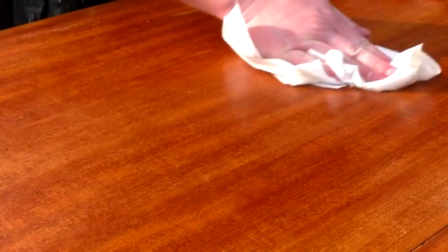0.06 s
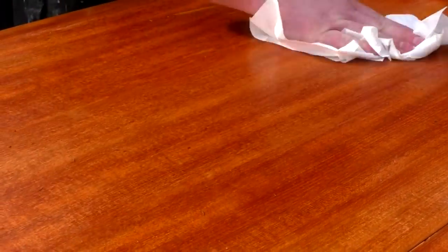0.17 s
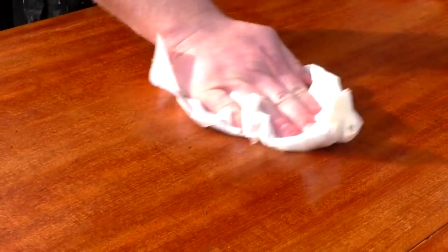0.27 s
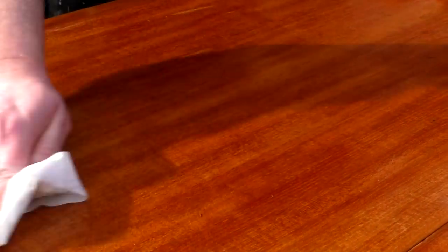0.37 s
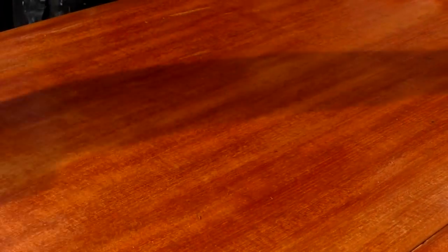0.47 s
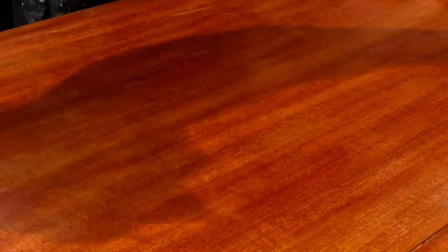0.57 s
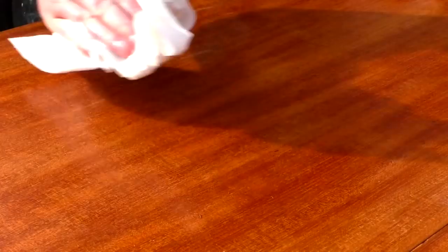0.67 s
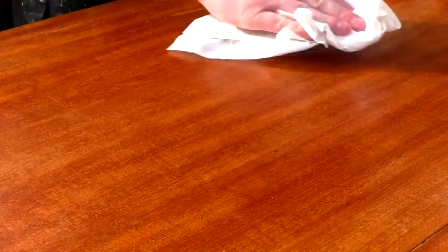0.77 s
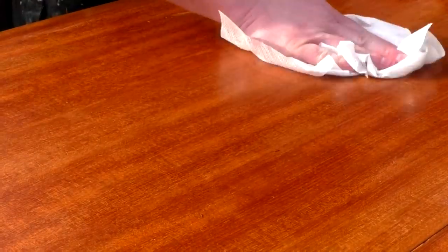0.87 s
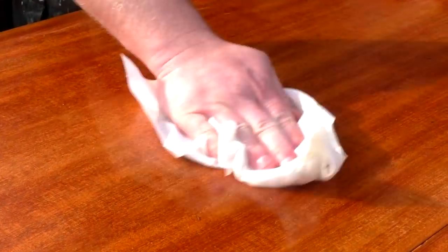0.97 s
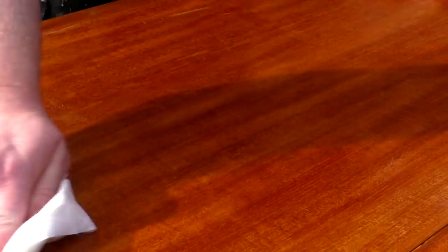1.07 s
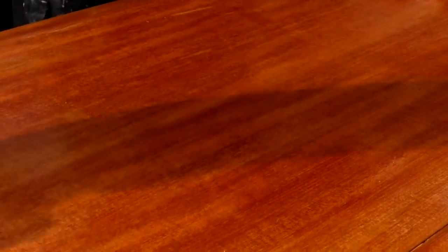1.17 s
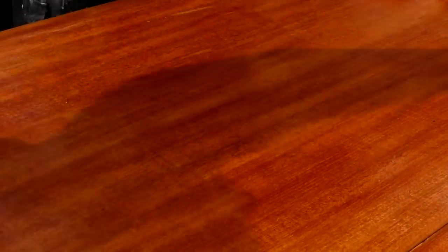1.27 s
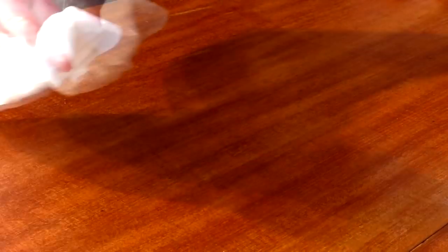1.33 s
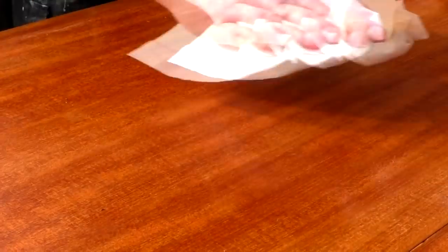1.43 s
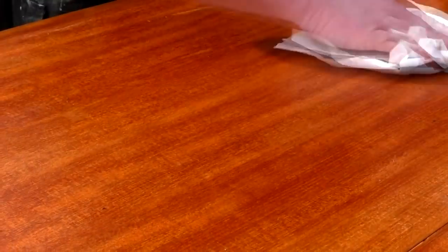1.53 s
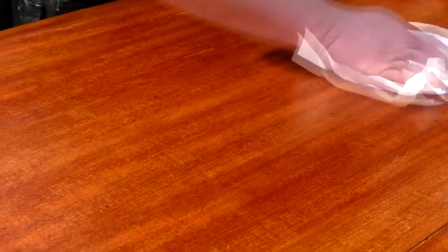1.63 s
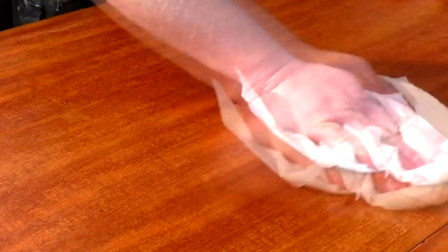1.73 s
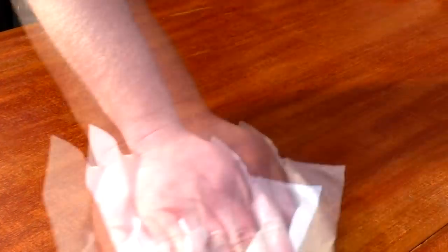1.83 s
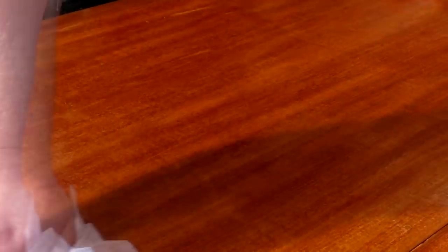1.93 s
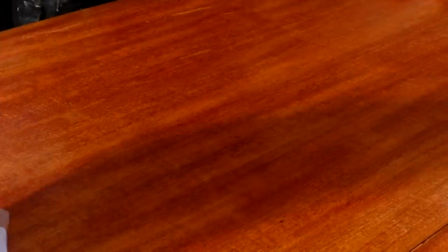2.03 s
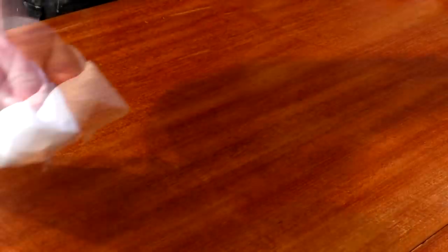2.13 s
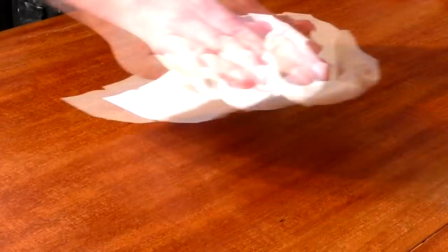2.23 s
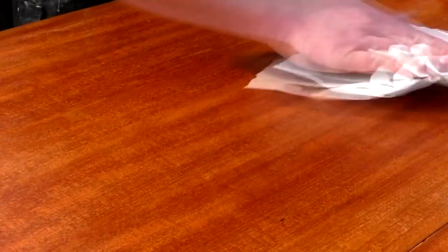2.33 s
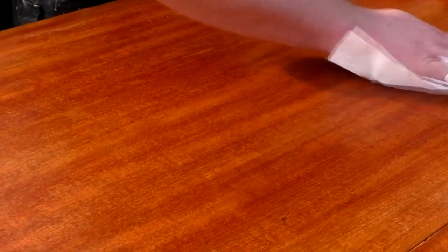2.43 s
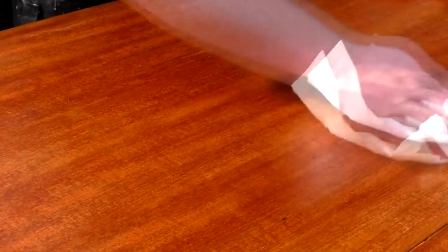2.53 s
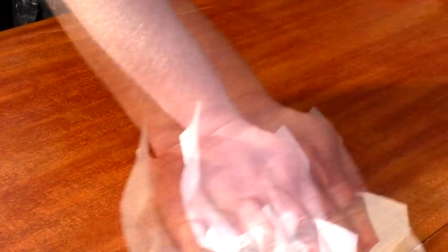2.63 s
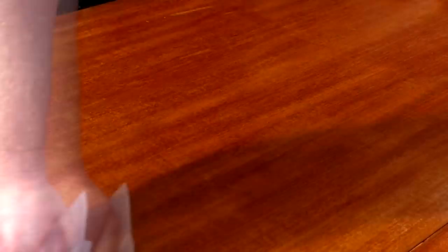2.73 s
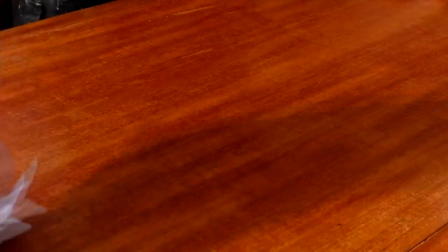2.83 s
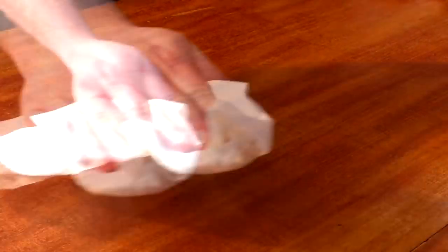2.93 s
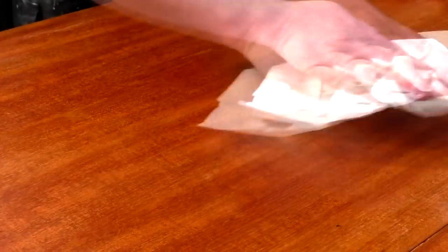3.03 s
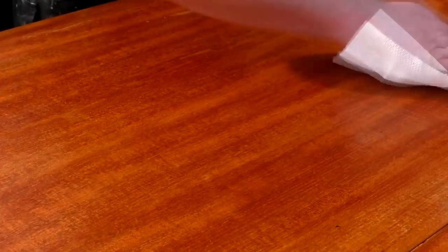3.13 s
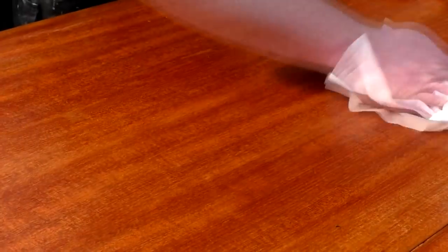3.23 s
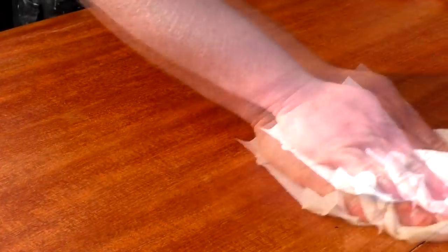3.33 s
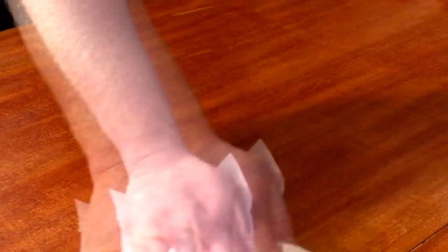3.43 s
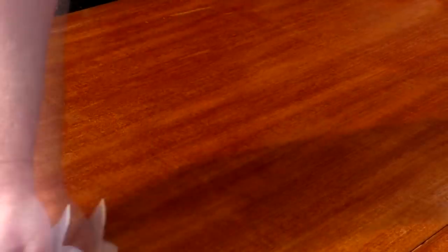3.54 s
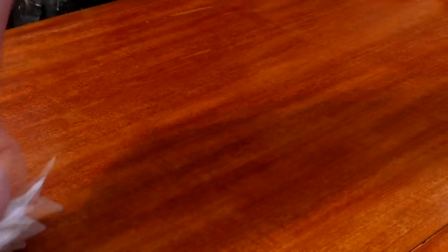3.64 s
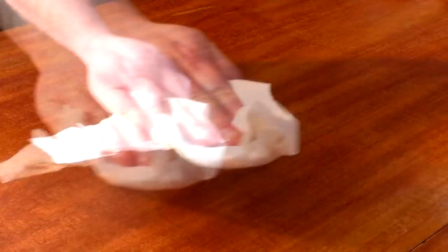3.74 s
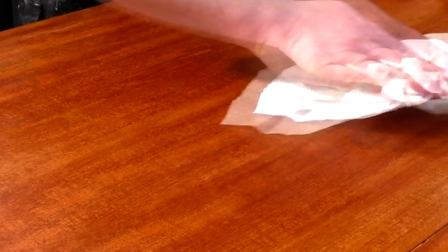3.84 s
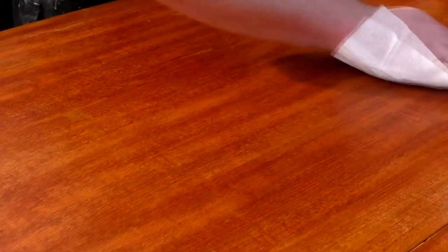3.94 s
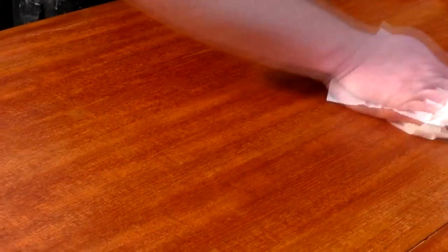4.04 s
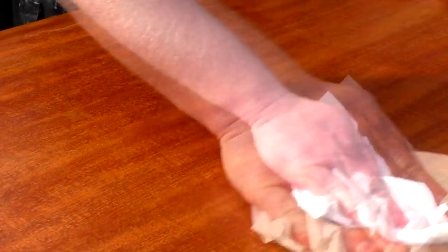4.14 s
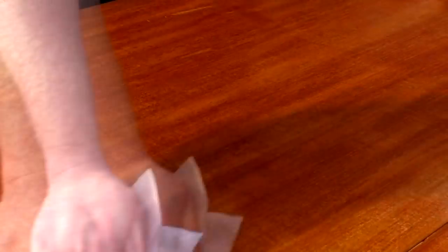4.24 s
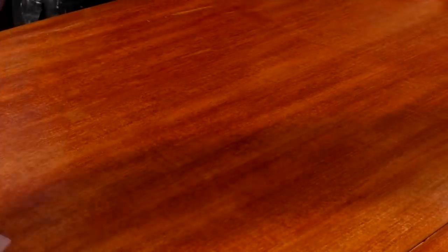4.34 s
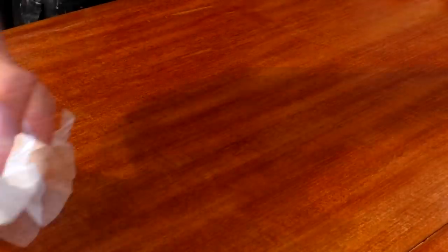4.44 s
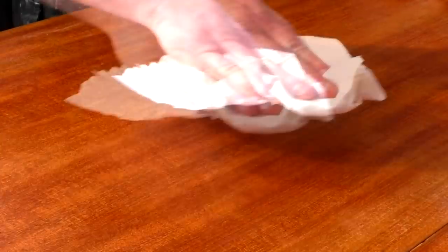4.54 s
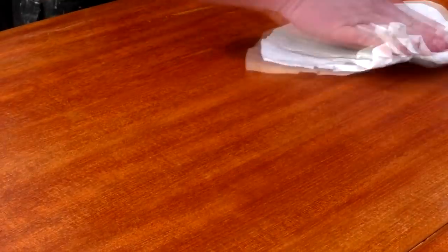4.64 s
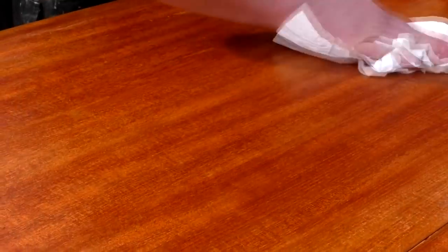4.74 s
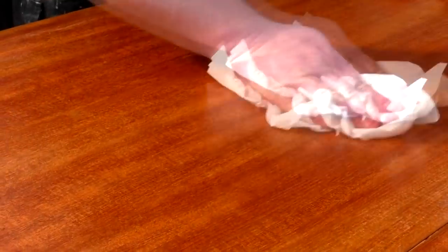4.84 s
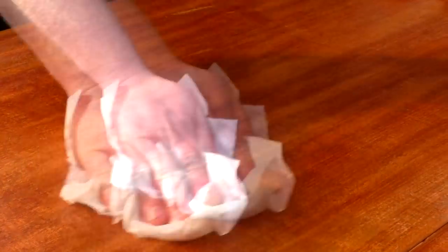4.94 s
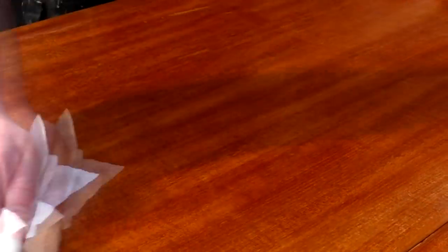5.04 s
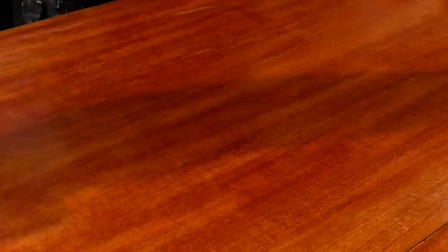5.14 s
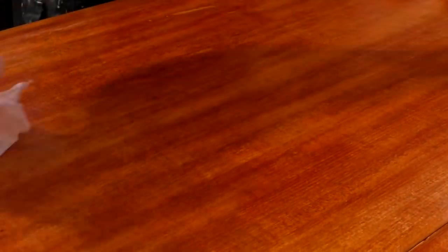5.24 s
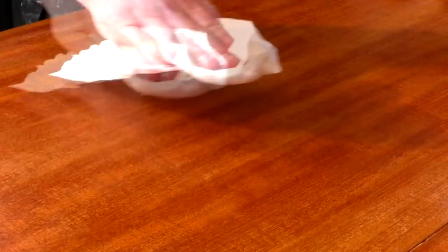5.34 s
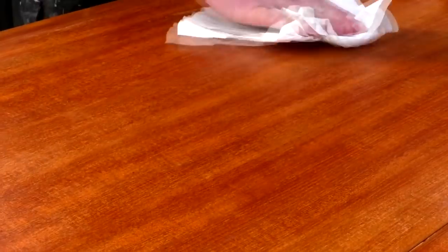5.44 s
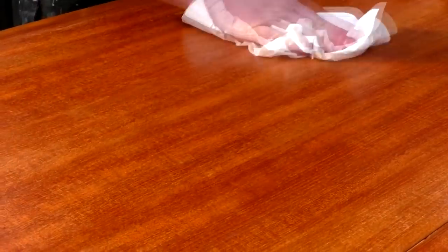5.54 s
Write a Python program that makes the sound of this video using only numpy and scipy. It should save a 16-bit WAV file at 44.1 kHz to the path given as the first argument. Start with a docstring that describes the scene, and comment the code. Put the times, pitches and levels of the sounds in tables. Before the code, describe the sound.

Eight breathy cloth strokes rub across a wooden tabletop, the first two nearly joined, the rest a little over half a second to almost a second apart. The hand's push rocks the table, giving muffled low knocks and brief shudders. A few barely audible whistles come from the cloth before three seconds. Microphone close, stereo, dry quiet indoor room with soft low background; slight air rumble at the start fades.

```python
"""A crumpled cloth is wiped to and fro over a varnished wooden table in a quiet room.
Throughout lie room noise and a faint machine hum; air stirring at the microphone ports soon dies down.
From the start, eight strokes swish as fibres slip on the grain, with light touches of loose folds between.
The push of the hand rocks the table: blows excite decaying modes, and dragging makes low modes shudder.
From 0.78 s to 3 s the cloth whistles faintly three times, as stick-slip tones."""
import sys
import numpy as np
from scipy import signal
from scipy.fft import rfft, irfft
from scipy.io import wavfile
from scipy.ndimage import uniform_filter1d

SR = 44100
rng = np.random.default_rng(int(sys.argv[2]) if len(sys.argv) > 2 else 0)


def boost(x):
    """Linear amplitude factor 10**(x/20) for a level x in decibels (scalar or array-like)."""
    u = np.asarray(x, float) / 20
    return 10 ** u


def store_wav(level_fs):
    """Save 16-bit WAV to argv[1]."""
    pcm = np.round(np.clip(np.atleast_2d(level_fs), -1, 1) * 32767)
    wavfile.write(sys.argv[1], SR, pcm.T.astype(np.int16))


N = 246866   # length [samples]


def rms_one(x):
    """Normalisation to unit root-mean-square level."""
    return x / np.sqrt(np.mean(x ** 2) + 1e-20)


def in_time(rows):
    """Linear interpolation of each column over time."""
    s, *columns = np.transpose(rows)
    return [np.interp(np.arange(N) / SR, s, column) for column in columns]


def at_hz(points, hz):
    """Interpolation on a logarithmic frequency axis."""
    point_hz, value = np.transpose(points)
    return np.interp(np.log(hz), np.log(point_hz), value)


def panned(left_right_db):
    """Stereo placement by level difference: positive is louder on the left."""
    return boost(np.array([left_right_db / 2, -left_right_db / 2]))


def drift(corner_hz):
    """Low-pass random process of spread 1: noise at every 40th sample through two equal one-pole filters."""
    r = np.exp(-80 * np.pi * corner_hz / SR)
    noise = rng.standard_normal(N // 40 + 2002)
    slow = signal.lfilter([1], [1, -2 * r, r * r], noise)[2000:]   # the filter has settled
    return np.interp(np.arange(N) / 40, np.arange(len(slow)), rms_one(slow))


def ring(force, hz, t60):
    """Damped resonance: a unit click starts a sine of height 1 that loses 60 dB in t60 seconds."""
    r, w = boost(-60 / (t60 * SR)), 2 * np.pi * hz / SR
    return signal.lfilter([0, np.sin(w)], [1, -2 * r * np.cos(w), r * r], force + 1e-18)


def coloured(white, spectrum, likeness):
    """Interchannel correlation: coloured mid and side noise mix into left and right spectra."""
    hz = np.maximum(np.fft.rfftfreq(N, 1 / SR), 10)
    alike = np.clip(at_hz(likeness, hz), 0, 1)
    mid, side = rfft(white) * boost(at_hz(spectrum, hz))
    shared, separate = np.sqrt(1 + alike) * mid, np.sqrt(1 - alike) * side
    return np.array([shared + separate, shared - separate]), hz


def held_tones(rows, waver, rough_db):
    """Stick-slip oscillation: tones swell and fade, unsteady in pitch (as a share) and in level."""
    out, t = np.zeros(N), np.arange(N) / SR
    unsteady_s = t + np.cumsum(waver * drift(11.1)) / SR
    for s, length, hz, db in rows:
        swell = np.sin(np.pi * np.clip((t - s) / length, 0, 1)) ** 0.92
        out += boost(db + 4.5) * swell * np.sin(2 * np.pi * hz * unsteady_s)
    return out * boost(rough_db * drift(52))


# spectrum of the room noise: (frequency [Hz], relative density [dB])
ROOM_SPECTRUM = [(15, -16), (25, -26), (91, 0), (161, 1.5), (234, -3.5), (360, -5), (447, -7.5),
                 (555, -13.5), (809, -13.5), (1390, -11.5), (1770, -17.5), (3110, -22.5), (5630, -38.5),
                 (11400, -37), (15700, -42)]
# left-right likeness of the room noise: (frequency [Hz], correlation [0 to 1])
ROOM_CORRELATION = [(60, 0.99), (180, 0.99), (550, 0.83), (1650, .6), (4500, 0.31), (7000, 0.84),
                    (11000, 0.55), (15000, 0.87)]
# stereo balance of the room noise: (frequency [Hz], left-right level [dB])
ROOM_LEFT_RIGHT = [(60, -2), (240, -2), (950, -2), (3770, 2.5), (15000, 0)]
# lines of the machine hum: (frequency [Hz], relative level [dB])
HUM_LINES = [(226.1, -72.5), (452.2, -75)]


def room(waver_db):
    """Diffuse background: ventilation, far noise and microphone hiss, plus two wavering hum lines."""
    both, hz = coloured(rng.standard_normal((2, N)), ROOM_SPECTRUM, ROOM_CORRELATION)
    noise = rms_one(irfft(both * panned(at_hz(ROOM_LEFT_RIGHT, hz)), N))
    noise_db = -60.5 + 2.13 * drift(5.0)
    t, hum = np.arange(N) / SR, np.zeros(N)
    for line_hz, db in HUM_LINES:
        hum += boost(db + 1.5 + waver_db * drift(2.3)) * np.sin(2 * np.pi * line_hz * t)
    return boost(noise_db) * noise + hum * panned(np.array([-2.5]))


# air stirring at the microphone ports dies down: (time [s], level about which it drifts [dB])
AIR_LEVEL = [(0, -52), (.6, -66), (1.3, -68), (2.5, -79), (5.6, -82)]


def air_on_microphone(cut_hz, lumpy_db):
    """Local turbulence: lumpy low-passed noise, independent in each channel."""
    low = signal.lfilter(*signal.butter(2, cut_hz, fs=SR), rng.standard_normal((2, N)))
    lumps_db = lumpy_db * np.array([drift(9.6), drift(1.4)])
    return boost(in_time(AIR_LEVEL)[0] + lumps_db) * rms_one(low)


# strokes of the cloth: (reaches full speed [s], run-up [s], hold [s], run-out [s], swish level [dB])
WIPE_STROKES = [(0.159, 0.31, 0.041, 0.068, -50), (0.279, 0.035, 0.089, 0.28, -49.5),
                (1.03, 0.22, 0.11, 0.18, -51), (1.806, 0.25, 0.2, 0.11, -51),
                (2.723, 0.31, 0.078, 0.12, -47.5), (3.367, 0.169, 0.22, 0.14, -50),
                (4.159, 0.16, 0.18, 0.15, -49.5), (4.87, 0.09, 0.23, 0.21, -53)]
# light touches of the loose folds between strokes: (time [s], swish level [dB], half length [s])
FOLD_TOUCHES = [(0.696, -74.5, 0.012), (0.786, -80, 0.027), (0.929, -57.5, 0.012), (1.233, -56, 0.011),
                (1.346, -75, 0.018), (1.466, -83, 0.12), (1.659, -60.5, 0.014), (2.163, -78.5, 0.17),
                (2.434, -70.5, 0.061), (2.501, -61.5, 0.02), (2.978, -69, 0.024), (3.137, -73.5, 0.01),
                (3.192, -69.5, 0.036), (3.263, -60, 0.0096), (3.753, -77.5, 0.069), (3.962, -72, 0.043),
                (4.029, -60, 0.017), (4.538, -67, 0.027), (4.728, -75, 0.043), (4.787, -65, 0.022),
                (5.333, -76, 0.028), (5.525, -71.5, 0.066), (5.573, -64, 0.017)]
RUN_DB, RUN_CURVE = 31, 1.473   # level lost over a run-up or run-out [dB]; roundness of the shoulder
SWELL_DB = 0.5   # the hand presses harder through the hold [dB]
TOUCH_DB, TOUCH_ONSET = 10, 0.82   # fall at one skewed half length [dB]; below 1, onset is faster than fade


def wiping_db():
    """Addition of incoherent powers: strokes run up, hold and run out; touches swell and fade."""
    t, power = np.arange(N) / SR, 1e-11
    for s, up, hold, out, db in WIPE_STROKES:
        away = np.maximum(np.maximum((s - t) / up, (t - s - hold) / out), 0)
        press_db = SWELL_DB * (np.clip((t - s) / hold, 0, 1) - .5)
        power = power + boost(2 * (db + press_db - RUN_DB * away ** RUN_CURVE))
    for s, db, half in FOLD_TOUCHES:
        away = np.maximum((s - t) / TOUCH_ONSET, (t - s) * TOUCH_ONSET) / half
        power = power + boost(2 * (db - TOUCH_DB * np.minimum(away ** 2, 20)))
    return 10 * np.log10(power)


RIGHT_END_DB, LEFT_END_DB = -1.58, 2.5   # position as left-right level [dB], before widening and smoothing
SETS_OFF, ARRIVES = 0.14, 0.7   # crossing starts this share into the hold, ends this share into the run-out


def position_db():
    """Source motion as level difference: a backhand from the left; later strokes cross leftwards and return."""
    ends = [(0.0063, LEFT_END_DB)]
    for s, up, hold, out, db in WIPE_STROKES[1:]:
        ends.append((s + SETS_OFF * hold, RIGHT_END_DB))
        ends.append((s + hold + ARRIVES * out, LEFT_END_DB))
    ends.append((N / SR, RIGHT_END_DB))
    return uniform_filter1d(in_time(ends)[0], size=SR // 10)


# colour of the rub by its level: (swish level [dB], coarse part [dB], body against scratch [dB])
RUB_COLOUR = [(-85, 1, 4.5), (-76.5, 2.5, 6), (-66.5, 4, 4), (-57.5, 2.5, -1), (-43, -0.5, -4.5)]
# spectrum of the rub before its parts are balanced: (frequency [Hz], relative density [dB])
SWISH_SPECTRUM = [(410, -26), (700, -7), (851, -16), (1020, -5.5), (1310, -0.5), (1410, -2.5), (1930, -2),
                  (2850, 0), (3470, -1.5), (4500, -1.5), (5910, -4), (11200, 1), (15100, -6), (15700, -8)]
# left-right likeness of the rub: (frequency [Hz], correlation [0 to 1])
SWISH_CORRELATION = [(700, 0.76), (1650, 0.95), (3500, 0.98), (7000, 0.97), (11000, .97), (15000, 0.91)]
BODY_HZ, COARSE_HZ = 2000, 5200   # upper edges of the body and of the whole coarse part [Hz]
COARSE_DB_PER_PAN_DB = 1.01   # the rub sounds coarser on the left side of the table


def swish(level_db, grain_db, grains_per_s, flicker_db, patchy_db):
    """Friction noise: fibres catch and slip on the grain as dense tiny clicks over smooth hiss."""
    pan_db = position_db()
    table_db, *colour = np.transpose(RUB_COLOUR)
    coarse_db, body_db = [np.interp(level_db, table_db, column) for column in colour]
    coarse_db = coarse_db + COARSE_DB_PER_PAN_DB * pan_db

    sizes = boost(2.5 * np.minimum(rng.exponential(1, N), 5)) * rng.choice([-1, 1], N)
    slips = rms_one(sizes * (rng.random(N) < grains_per_s / SR))
    white = rng.standard_normal((2, N))
    white[0] = rms_one(white[0] + boost(grain_db) * slips)   # clicks go to the mid signal

    both, hz = coloured(white, SWISH_SPECTRUM, SWISH_CORRELATION)
    low = 1 / (1 + (hz / COARSE_HZ) ** 6)
    lowest = 1 / (1 + (hz / BODY_HZ) ** 4)
    fine = rms_one(irfft(both * (1 - low), N))
    body = irfft(both * low * lowest, N)
    scratch = irfft(both * low * (1 - lowest), N)
    patchy_scratch = scratch * boost(patchy_db * drift(8.1))
    patchy_body = body * boost(body_db + patchy_db * drift(17.0))
    coarse = rms_one(patchy_scratch + patchy_body)

    shared_flicker_db = flicker_db * drift(28.0)
    fine *= boost(shared_flicker_db + .5 * flicker_db * drift(29))
    coarse *= boost(coarse_db + shared_flicker_db + flicker_db * drift(130))
    return boost(level_db) * (fine * panned(1.5 * pan_db) + coarse * panned(1.4 * pan_db))


# the table rocks and knocks; group levels add to the blow:
# (time [s], blow [dB], deep modes [dB], ringing modes [dB], upper modes [dB])
TABLE_BLOWS = [(0.017, -31.5, -12.5, -9, -10.5), (0.157, -39, -1, -4.5, -15), (0.196, -46.5, -3, -5, -10),
               (0.349, -32.5, -13, -5.5, -14.5), (0.448, -26, -27, -7, -6), (0.468, -35.5, -17, 2.5, -18),
               (0.502, -30, -15.5, -6.5, -6.5), (0.77, -49.5, -10, -7, -38), (0.925, -40.5, -8.5, -12, -12),
               (1.036, -32.5, -6.5, -4.5, -10), (1.303, -35, -16, -42, -14.5),
               (1.343, -35.5, -22, -10, -25), (1.66, -40.5, -1.5, -9, -13), (1.708, -24.5, -10.5, -10, -16),
               (1.767, -41, -3, -5, -13), (1.824, -29, -11, -6.5, -10.5), (1.893, -36.5, -13.5, -15, -7.5),
               (2.582, -26, -18, -9.5, -11), (2.693, -31.5, -10.5, -2.5, -11), (2.865, -42, -17, -11, -36),
               (3.196, -27, -19, -12, -19), (3.237, -29, -27, -25, -21.5), (3.36, -30.5, -10.5, -5.5, -9.5),
               (4.104, -28, -51, -5, -12.5), (4.227, -27.5, -15, -6.5, -12.5),
               (4.529, -30, -45, -16, -24.5), (4.873, -30, -17, -15, -24.5),
               (5.022, -27.5, -17, -6.5, -10.5), (5.067, -48.5, -26, -21, 4.5), (5.116, -40.5, -27, -12, 2),
               (5.204, -43.5, -38, -7, 2), (5.579, -43, -8, -23, -22)]
# modes of the tabletop: (frequency [Hz], excitation [dB], t60 [s], left-right level [dB])
TABLE_MODES = [(93.1, 4.5, 0.44, -2.5), (114, -1, 0.49, -0.5), (135.9, -5, 0.18, -2.5), (165, 6.5, 0.22, 0),
               (183, -12.5, 0.76, -8.5), (242.7, -5.5, 0.3, -3), (308, -3, 0.078, -2),
               (385.3, -5.5, 0.067, -5), (444, -11, 0.077, -4), (514, -14, 0.08, -4), (686, -10, 0.038, -7),
               (840, -10, 0.0083, -6.5), (1350, -4.5, 0.0095, 4), (2660, -10.5, 0.0045, 13)]
DEEP_HZ, RINGING_HZ, UPPER_HZ = 120, 150, 270   # bounds of the mode groups [Hz]


def table(wipe_db, push_s, scuff_s, bass_cut_hz, drag_db):
    """Modal excitation: blows push the low modes softly and scuff the upper; wiping shakes the low ones."""
    s, blow_db, deep_db, ringing_db, upper_db = np.transpose(TABLE_BLOWS)
    at = np.round(s * SR).astype(int)
    spread_db = rng.normal(0, 1.7, (len(at), len(TABLE_MODES)))
    shake = boost(wipe_db + drag_db) * rng.standard_normal(N)
    push_phase = np.clip(np.arange(0, .02, 1 / SR) / push_s, 0, 1)
    push = np.sin(np.pi * push_phase) ** 2   # contact force, one smooth hump
    fade = np.exp(-1 / (scuff_s * SR))
    low, upper = np.zeros((2, 2, N))
    for k, (hz, level_db, t60, pan_db) in enumerate(TABLE_MODES):
        if hz < DEEP_HZ:
            group_db = deep_db
        elif hz < RINGING_HZ:
            group_db = 0
        else:
            group_db = ringing_db if hz < UPPER_HZ else upper_db
        clicks = np.zeros(N)
        clicks[at] = boost(blow_db + group_db + level_db + spread_db[:, k])
        side = panned(np.array([pan_db]))
        if hz > UPPER_HZ:   # a tap, alternating in sign by mode, and a burst of noise that dies away
            burst = signal.lfilter([np.sqrt(1 - fade ** 2)], [1, -fade], clicks)
            scuff = burst * rng.standard_normal(N)
            tap = clicks * (-1) ** k
            upper += side * ring(boost(1.0) * scuff + boost(-7.0) * tap, hz, t60)
        else:   # the low modes all start the same way
            low += side * ring(boost(level_db) * shake + clicks, hz, t60)
    low = signal.fftconvolve(low, push[None] / push.sum())[:, :N]
    # the microphone's steep low cut thins the deepest part of the knocks
    bass_cut = signal.butter(4, bass_cut_hz, "high", fs=SR, output="sos")
    return signal.sosfilt(bass_cut, low) + upper


# the dragging hand holds a table mode: (start [s], length [s], frequency [Hz], relative level [dB])
TABLE_SHUDDERS = [(.03, 0.075, 170, -46.5), (.53, .13, 167, -48.5), (.92, 0.049, 145, -56),
                  (1.6, 0.12, 165, -51), (1.87, 0.12, 183, -49), (2.34, 0.21, 161, -57),
                  (4.52, 0.07, 150, -52), (5.07, 0.13, 175, -53)]


def shudders():
    """Stick-slip at a table mode: the dragging hand holds it shuddering."""
    return held_tones(TABLE_SHUDDERS, waver=0.0181, rough_db=4.5) * panned(np.array([-1.6]))


# faint whistles of the cloth: (start [s], length [s], frequency [Hz], relative level [dB])
CLOTH_SQUEAKS = [(.78, .2, 1360, -73.5), (2.32, 0.29, 2650, -75.5), (2.88, 0.075, 2330, -71)]


def squeaks():
    """Stick-slip of the cloth itself: faint high whistles."""
    return held_tones(CLOTH_SQUEAKS, waver=.02, rough_db=4) * panned(np.array([5]))


def scene():
    """Linear superposition of room, air, cloth and table."""
    wipe_db = wiping_db()
    background = room(waver_db=4.0) + air_on_microphone(cut_hz=80, lumpy_db=4)
    cloth = swish(wipe_db, grain_db=-7, grains_per_s=3000, flicker_db=0.84, patchy_db=0.98)
    wood = table(wipe_db, push_s=0.0053, scuff_s=0.018, bass_cut_hz=107.0, drag_db=-43.5)
    return background + cloth + squeaks() + wood + shudders()


def top_cut(x):
    """Nothing passes above the cut-off."""
    return signal.sosfilt(signal.butter(12, 15840, fs=SR, output="sos"), x)


def record(dry):
    """Signal chain: the finished mix is delivered with its treble ending near 15.8 kHz."""
    return top_cut(dry)


dry = scene()
out = record(dry)
store_wav(out)
```